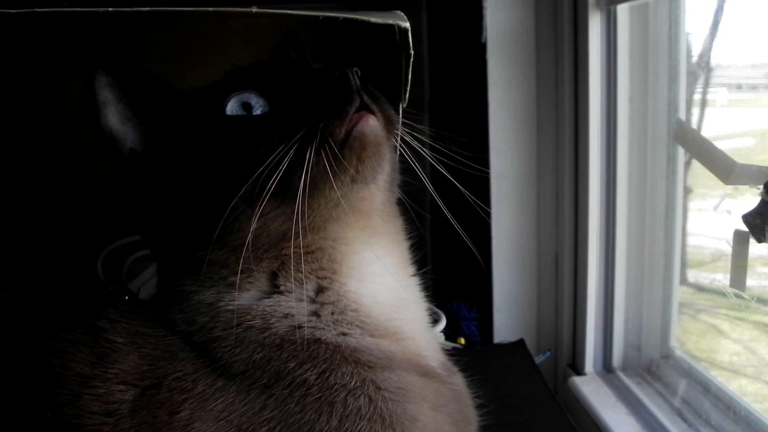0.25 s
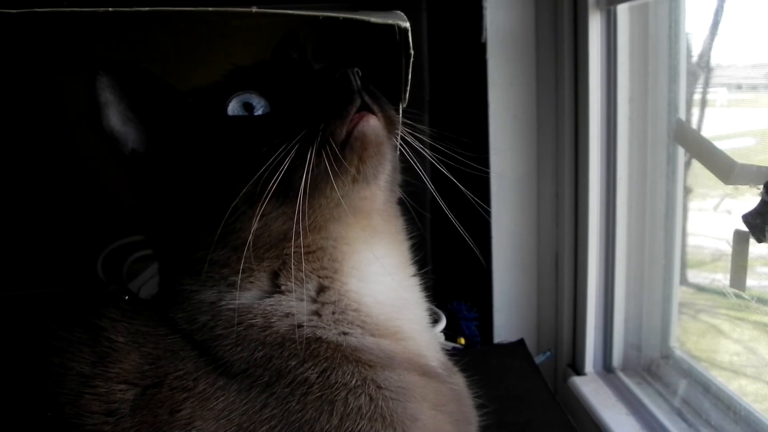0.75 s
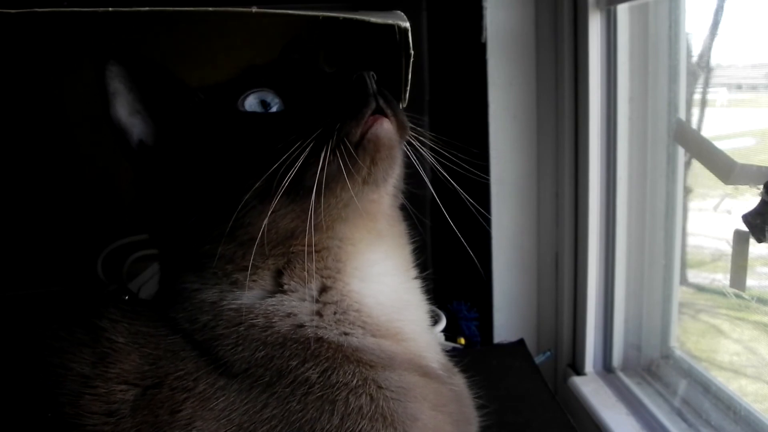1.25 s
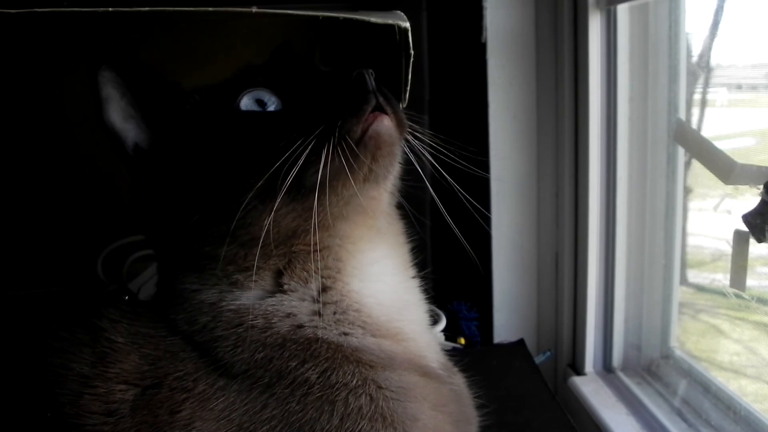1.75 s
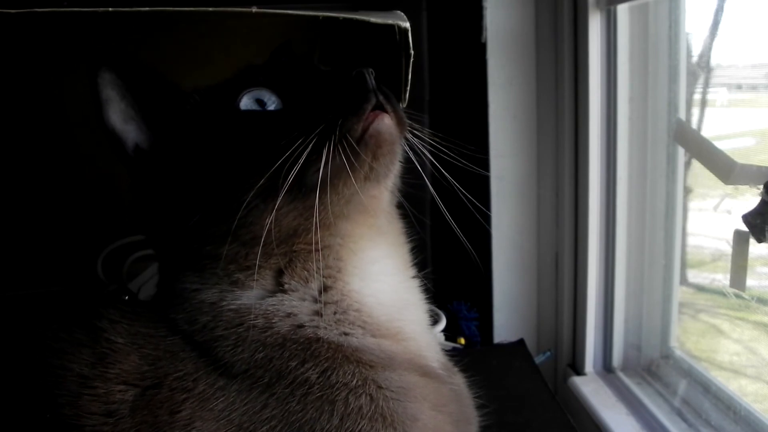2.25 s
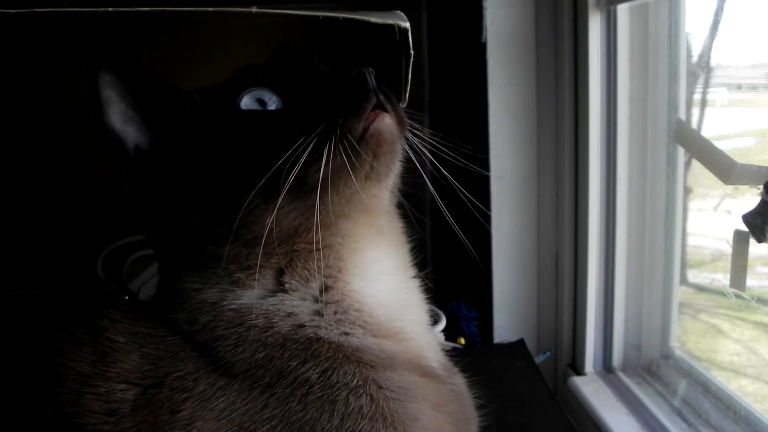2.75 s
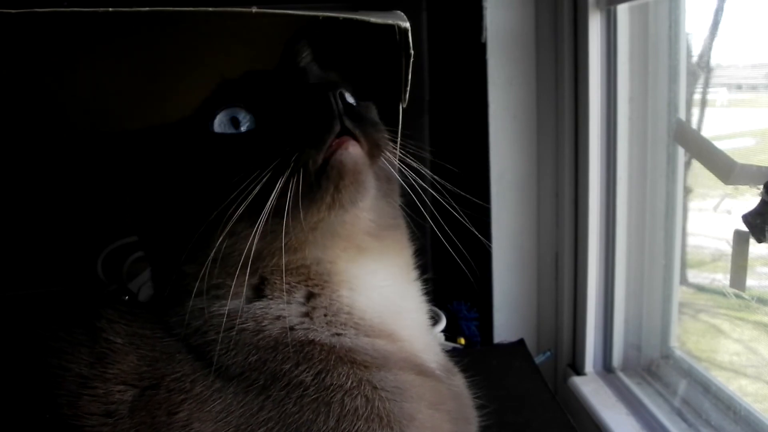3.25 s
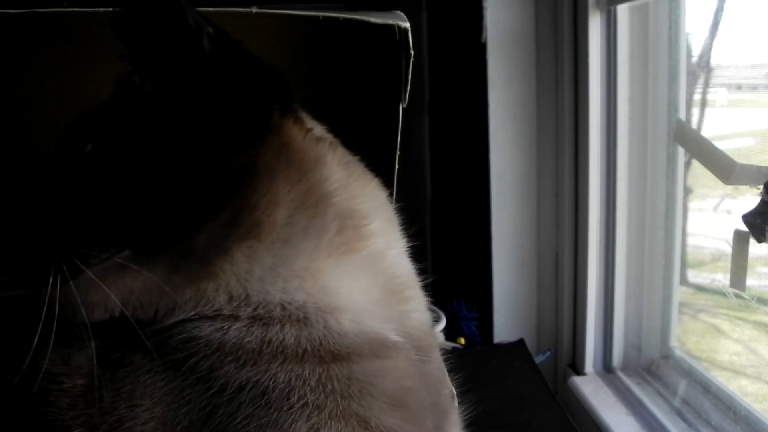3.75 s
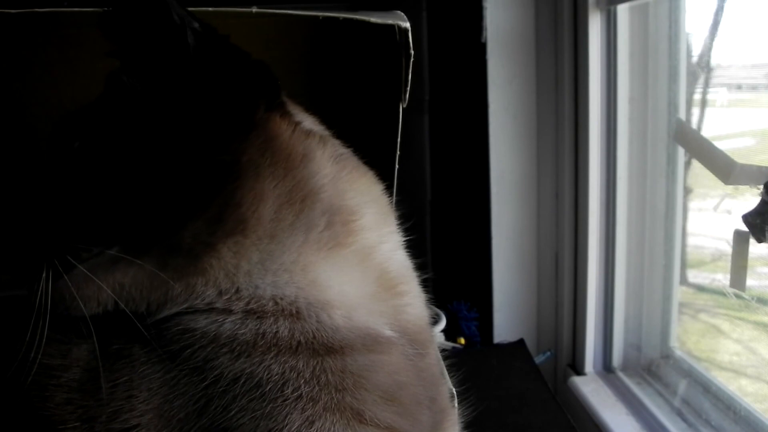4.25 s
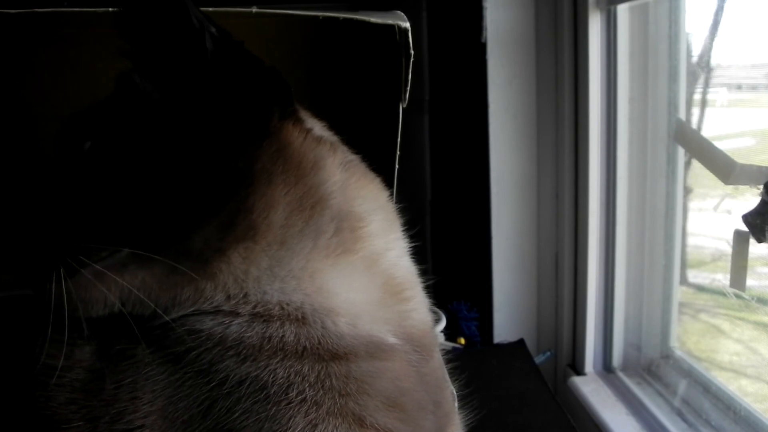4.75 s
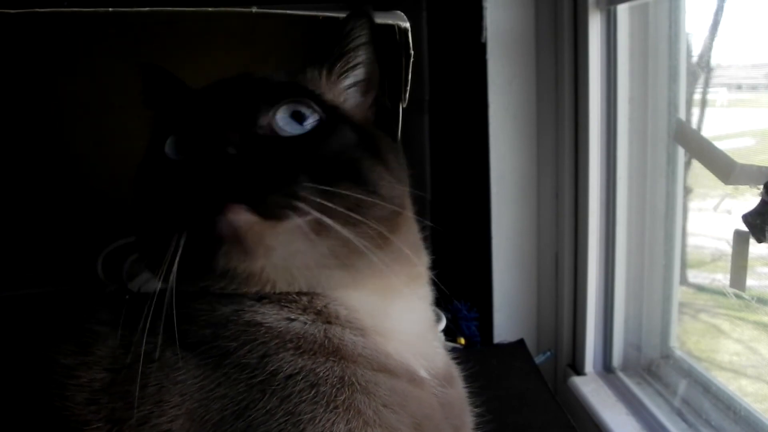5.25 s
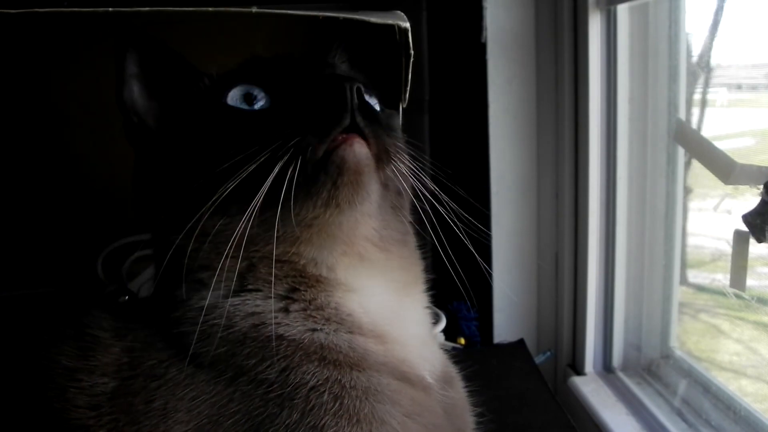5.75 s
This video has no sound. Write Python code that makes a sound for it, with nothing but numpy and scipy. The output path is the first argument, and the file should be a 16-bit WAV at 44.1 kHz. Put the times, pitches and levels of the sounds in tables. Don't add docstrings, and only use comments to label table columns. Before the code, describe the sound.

Close to the microphone, a cat chatters at a window: about nine dry tooth clicks within the first second, uneven in strength, each ringing briefly in the mouth and small room. Then only quiet traffic hum and air, with a faint falling bird slur and high ticks. A second cluster of clicks follows in the middle, ending near four and a half seconds; one last bird slur comes after.

```python
import sys
import numpy as np
from scipy import signal
from scipy.fft import rfft, irfft, dct, next_fast_len
from scipy.io import wavfile
from scipy.ndimage import uniform_filter1d, map_coordinates

SR = 44100
rng = np.random.default_rng(int(sys.argv[2]) if len(sys.argv) > 2 else 0)


def voltage_ratio(decibels):
    exponent = np.asarray(decibels, float) / 20
    return 10 ** exponent


def waveform_to_disk(signal):
    frames = np.transpose(np.atleast_2d(signal))
    scaled = np.clip(frames, -1, 1) * 32767
    samples = np.round(scaled).astype(np.int16)
    wavfile.write(sys.argv[1], SR, samples)


N = 265041


def unit(x):
    return x / np.sqrt(np.mean(x ** 2) + 1e-20)


def along(points, hz):
    f, v = np.transpose(points)
    return np.interp(np.log(hz + 1), np.log(f + 1), v)


def wobble(rate):
    knots = rng.standard_normal(int(N * rate / SR) + 4)
    return map_coordinates(knots, [np.arange(N) * rate / SR])


def filtered(x, response):
    m = next_fast_len(x.shape[-1] + 8192)
    spectrum = rfft(x, m) * response(np.fft.rfftfreq(m, 1 / SR))
    return irfft(spectrum, m)[..., :x.shape[-1]]


def tail(decays, seconds):
    hz, t, z = signal.stft(rng.standard_normal((2, int(seconds * SR))), SR, nperseg=128)
    fade = voltage_ratio(-60 * t / along(decays, hz)[:, None])
    noise = signal.istft(z * fade, SR, nperseg=128)[1]
    return noise / np.linalg.norm(noise[0])


# (f/Hz, correlation)
LIKENESS = [(60, 0.94), (190, 1), (260, 0), (330, -0.72), (700, -0.8), (1500, -0.62), (2600, -.45),
            (5000, 0.15)]
# (f/Hz, left-right level/dB)
LEFT_LEAN = [(60, -4), (220, -2), (800, -4), (2910, -0.5), (10600, -0.5)]


def diffuse(x, spectrum):
    def blend(hz):
        turn = np.arccos(np.clip(along(LIKENESS, hz), -1, 1)) / 2
        return voltage_ratio(along(spectrum, hz)) * np.array([np.cos(turn), np.sin(turn)])

    def lean(hz):
        db = along(LEFT_LEAN, hz)
        return voltage_ratio(np.array([db / 2, -db / 2]))

    mid, side = filtered(x, blend)
    return filtered(np.array([mid + side, mid - side]), lean)


# (f/Hz, width f/Hz, level/dB)
MOUTH_RESONANCES = [(724, 260, 1), (1120, 810, 0.5), (2503, 900, 2), (4510, 2900, 0.5), (5960, 230, 3),
                    (8070, 230, -2.5), (10380, 2300, -4.5)]
# (f/Hz, inner width f/Hz, outer width f/Hz)
CHEEK_HOLLOWS = [(3580, 30, 750), (6800, 200, 900), (8550, 250, 700)]


def mouth(hz, hollow_db, bright_db, stretch):
    f = hz / stretch
    peaks = 0
    for c, width, db in MOUTH_RESONANCES:
        gain = voltage_ratio(db + hollow_db * (c < 1500) + bright_db * (c > 3500))
        polarity = np.sign(7000 - c)
        peaks = peaks + polarity * gain * 1j * f * width / (c * c - f * f + 1j * f * width)
    dips = 1
    for c, inner, outer in CHEEK_HOLLOWS:
        dips = dips * (c * c - hz * hz + 1j * hz * inner) / (c * c - hz * hz + 1j * hz * outer)
    return peaks * dips / (1 + 1j * hz / 6500) ** 2


def ports(hz):
    left = .78j * hz / (1700 + 1j * hz) * np.exp(2j * np.pi * hz / SR)
    return np.array([left, 1 + 0 * hz])


# (delay t/ms, left level/dB, right level/dB)
SURFACES = [(0, 0, 0), (.43, -3, -30), (.52, -30, -4), (.92, -1, -.5), (2.62, -5, -7), (3.4, -14, -9),
            (4.4, -14, -10), (18.8, -6, -20), (21.2, -16, -13), (31, -20, -18)]


def echoes(hz, scatter):
    total = 0
    for (ms, left, right), (a, b) in zip(SURFACES, scatter):
        gain = voltage_ratio([[left + 1.5 * a], [right + 1.5 * a]])
        total = total + gain * np.exp(-2j * np.pi * hz * (ms + .012 * b) / 1000)
    return total


# (t/s, peak level/dB, hollowness level/dB, brightness level/dB)
JAW_CLICKS = [(0.1419, -1, -2.5, -2.5), (0.2606, -13, -2, 1), (0.392, -17, 5.5, 7.5), (0.4586, -7, 0.5, 0),
              (0.5981, -22.5, -3, -1.5), (0.6503, -4, -2.5, 1.5), (0.7512, -7, 1.5, -1.5),
              (0.8236, -6, -2, 2), (0.9627, -29.5, 8.5, 10.5), (3.4529, -18, 5, 5.5), (3.6445, -16, 5.5, 5),
              (3.704, -10.5, 4, 4.5), (3.7697, -5, 1, 3.5), (3.8292, -7, 1, 2), (4.127, -17.5, 2, 2.5),
              (4.372, -20.5, -10, -3.5), (4.426, -16, 3, 6.5), (4.4769, -4.5, -2, 1)]
# (f/Hz, t60/s)
ROOM_DECAY = [(300, 0.067), (800, 0.27), (2100, 0.25), (5500, 0.19), (10000, 0.15)]


def cat():
    lead, length = 256, 16384
    out = np.zeros((2, N + length))
    tap = np.eye(1, length, lead)[0]
    walls = tail(ROOM_DECAY, seconds=.3)
    for s, db, hollow_db, bright_db in JAW_CLICKS:
        scatter = rng.standard_normal((len(SURFACES), 2))
        gape = 1 + 0.037 * scatter[0, 1]
        click = voltage_ratio(db + 11.5) * filtered(tap, lambda hz: mouth(hz, hollow_db, bright_db, gape))
        near = filtered(click, lambda hz: ports(hz) * echoes(hz, scatter))
        answer = .8 * walls + .6 * tail(ROOM_DECAY, seconds=.3)
        late = signal.fftconvolve(np.pad(click, (130, 0))[None], answer, axes=1)[:, :length]
        late = voltage_ratio(1) * diffuse(late, [(400, -4), (1500, -1), (8000, -2)])
        start = round(s * SR) - lead + 40
        out[:, start:start + length] += near + late
    return out[:, :N]


# (top t/s, fall t/s, level/dB, upswing t/s)
FALLING_SLURS = [
    (1.14, .127, -58, 0.016),
    (3.293, 0.096, -57, 0.037),
    (5.155, .145, -58.5, .015),
]
# (share of the fall, level/dB)
FALL_SWELL = [(0, -5), (.3, -3), (.65, 0), (1, -8)]


def slurs():
    top_hz, end_hz, sag, upswing_oct_per_s = 5110, 2116, 0.94, 23
    share = np.linspace(0, 1, num=12)
    fall_hz = top_hz * (end_hz / top_hz) ** (share ** sag)
    swell_db = np.interp(share, *np.transpose(FALL_SWELL))
    notes = []
    for s, fall, db, up in FALLING_SLURS:
        upswing = (s - up, top_hz * 2 ** (-upswing_oct_per_s * up), db - 3.5)
        notes.append([upswing, *zip(s + fall * share, fall_hz, db + swell_db)])
    return notes


# (tick t/s, tick level/dB, pause from tick onset t/s, rise level/dB)
FAR_PHRASES = [
    (1.855, -65.5, .1, -77),
    (2.84, -70, 0.091, -76),
]


def phrases():
    tick_s, tick_hz, drop_hz, fade_db = .045, 8150, 600, 12
    rise_s, from_hz, to_hz = .14, 6100, 9300
    ticks, rises = [], []
    for s, tick_db, gap, rise_db in FAR_PHRASES:
        ticks.append([(s, tick_hz, tick_db), (s + tick_s, tick_hz - drop_hz, tick_db - fade_db)])
        rises.append([(s + gap, from_hz, rise_db), (s + gap + rise_s, to_hz, rise_db)])
    return ticks + rises


def whistle(notes, burr_hz, burr):
    out = np.zeros(N)
    for note in notes:
        s, hz, db = np.transpose(note)
        t = np.arange(round(s[0] * SR), round(s[-1] * SR))
        beat = np.sin(2 * np.pi * burr_hz * t / SR + rng.uniform(0, 6.3))
        pitch = np.interp(t / SR, s, hz) * (1 + .045 * burr * beat)
        tone = np.sin(2 * np.pi * np.cumsum(pitch) / SR)
        level = voltage_ratio(np.interp(t / SR, s, db) + 15) * (1 + burr * beat)
        out[t] = level * signal.windows.tukey(len(t), .15) * tone
    return out


def birds():
    song = whistle(slurs(), burr_hz=83.5, burr=0.65) + whistle(phrases(), burr_hz=60, burr=0.16)
    song = song * voltage_ratio(2 * wobble(60))
    fronts = tail([(2000, 0.2), (8000, 0.31)], seconds=0.19)
    yard = signal.fftconvolve(np.pad(song, (200, 0))[None], fronts, axes=1)[:, :N]
    mid, side = voltage_ratio(-1.5) * yard
    return song * voltage_ratio([[-10], [-8]]) + np.array([mid + 0.63 * side, mid - 1.2 * side])


def rush(spectrum, patchy_db):
    z = signal.stft(rng.standard_normal((2, N)), nperseg=512)[2]
    field = uniform_filter1d(rng.standard_normal(z.shape[1:]), size=6, axis=0)
    field = uniform_filter1d(field, size=12, axis=1)
    noise = signal.istft(z * voltage_ratio(patchy_db * unit(field)), nperseg=512)[1][:, :N]
    pair = diffuse(noise, spectrum)
    return pair / np.std(pair.mean(axis=0))


# (f/Hz, level/dB per Hz)
TRAFFIC_HUM = [(12, -54), (20, -27), (37, -16.5), (64, -15), (97, 1.5), (140, 1), (171, -6.5), (199, -5),
               (275, -12.5), (340, -41), (440, -43), (750, -120)]
# (f/Hz, level/dB per Hz)
AIR_WASH = [(150, -27.5), (260, -9.5), (334, -5.5), (423, 2), (502, -1), (666, -1), (1050, -9.5),
            (1290, -5.5), (1630, -12), (3350, -18), (4810, -25.5), (7820, -35), (11000, -60), (14400, -84),
            (22000, -120)]
# (t/s, level/dB)
AIR_SWELL = [(0.0, -45), (0.77, -48), (1.04, -48.5), (1.24, -49.5), (3.21, -48), (3.65, -46), (4.74, -49),
             (6.01, -48.5)]


def town():
    breeze_db = np.interp(np.arange(N) / SR, *np.transpose(AIR_SWELL))
    hum = voltage_ratio(-45.5 + 0.19 * wobble(16)) * rush(TRAFFIC_HUM, patchy_db=1.0)
    wash = voltage_ratio(breeze_db + 0.52 + 0.23 * wobble(1.9)) * rush(AIR_WASH, patchy_db=1.0)
    return hum + wash


def scene():
    return cat() + birds() + town()


# (f/Hz, masking level over rounding step level/dB)
GRAIN = [(200, 16), (800, 9), (1600, 6), (2800, 4), (3700, -1.5), (5200, 0), (7000, -2.5), (8500, -5.5),
         (10300, -5)]
# (f/Hz, level/dB)
FINEST_GRAIN = [(3000, -62), (4500, -53.5), (5500, -49), (7000, -47.5), (8500, -48), (10000, -44),
                (11500, -42)]


def camera_grain(x, hangover_db, spread_db, scatter_db):
    n, start, band = 1024, 330, 16
    pair = np.array([x[0] + x[1], x[0] - x[1]]) / 2
    pair = np.pad(pair, ((0, 0), (n + start, 2 * n)))
    count = pair.shape[1] // n - 1
    window = np.sin(np.pi * (np.arange(2 * n) + .5) / (2 * n))
    where = np.arange(count)[:, None] * n + np.arange(2 * n)
    a, b, c, d = np.split(pair[:, where] * window, 4, axis=2)
    folded = np.concatenate([-c[..., ::-1] - d, a - b[..., ::-1]], axis=2)
    lines = dct(folded, type=4, norm="ortho")
    power = np.mean(lines.reshape(2, count, -1, band) ** 2, axis=(0, 3))
    level_db = 10 * np.log10(power + 1e-14)
    bands = np.arange(n // band)
    distance = abs(bands[:, None] - bands)
    mask_db = np.max(level_db[:, None] - spread_db * distance, axis=2)
    later = [np.pad(mask_db, ((j, 0), (0, 0)), "edge")[:count] - hangover_db * j for j in range(6)]
    mask_db = np.max(later, axis=0)
    luck = rng.standard_normal((count, len(bands))) + .55 * rng.standard_normal((count, 1))
    hz = (bands + .5) * band * SR / (2 * n)
    step_db = np.maximum(mask_db - along(GRAIN, hz), along(FINEST_GRAIN, hz)) + scatter_db * luck
    step = np.repeat(voltage_ratio(step_db), band, axis=1)
    rounded = np.sign(lines) * np.floor(abs(lines) / step + .34) * step
    u, v = np.split(dct(rounded, type=4, norm="ortho"), 2, axis=2)
    blocks = np.concatenate([v, -v[..., ::-1], -u[..., ::-1], -u], axis=2) * window
    joined = blocks[:, 1:, :n] + blocks[:, :-1, n:]
    mid, side = joined.reshape(2, -1)[:, start:start + N]
    return np.array([mid + side, mid - side])


def band_limit(x):
    return signal.sosfilt(signal.butter(12, 11190, fs=SR, output="sos"), x)


# (f/Hz, level/dB per Hz)
MIC_HISS = [(2500, -47.5), (4500, -3.5), (7000, 0.5), (9000, -1), (11000, -5.5), (13000, -39)]


def record(dry):
    miked = filtered(dry, lambda hz: 1 / (1 + (hz / 11100) ** 40))
    miked = miked + voltage_ratio(-64.5) * rush(MIC_HISS, patchy_db=2.7)
    mix = camera_grain(miked, hangover_db=5, spread_db=4, scatter_db=3.5)
    return band_limit(mix)


dry = scene()
out = record(dry)
waveform_to_disk(out)
```